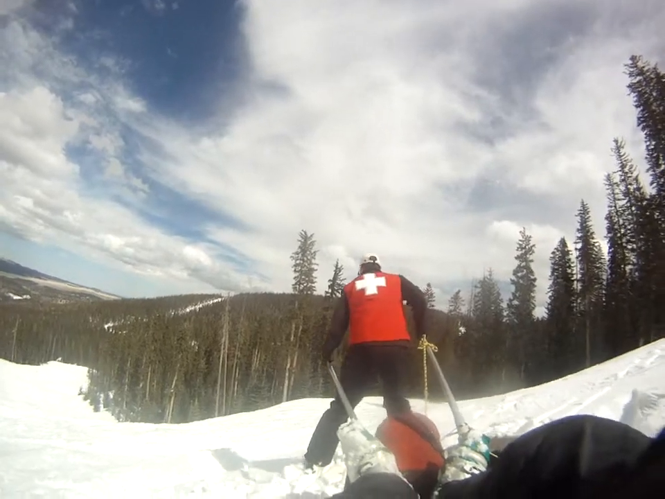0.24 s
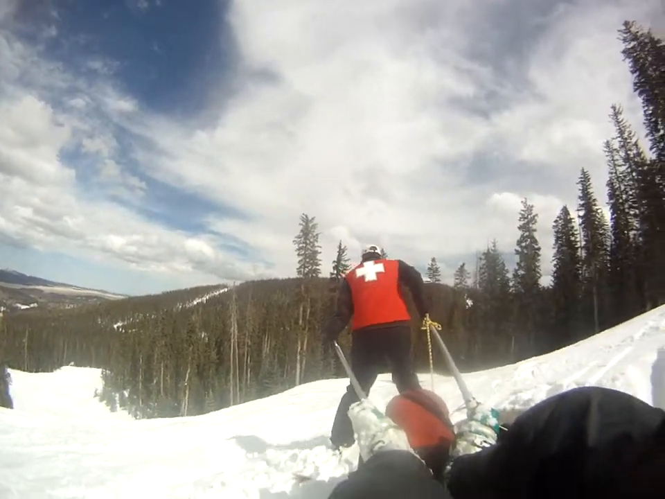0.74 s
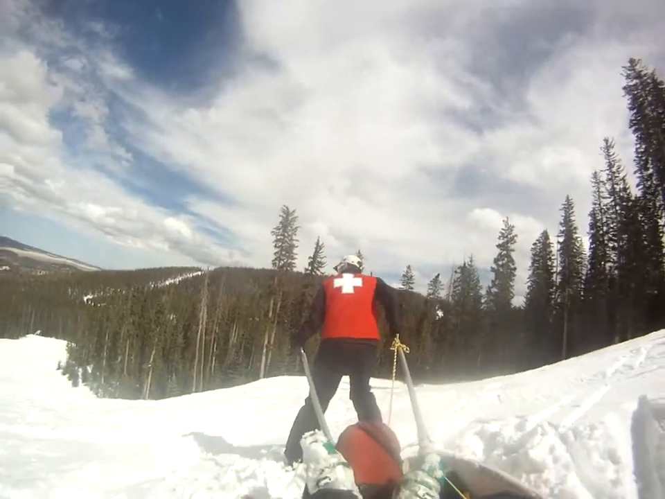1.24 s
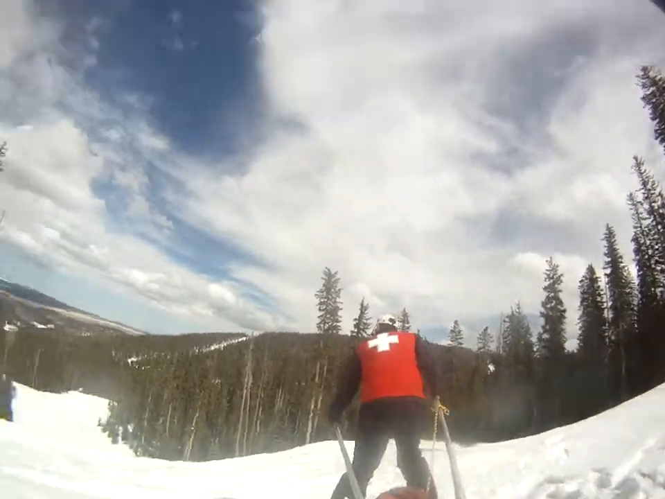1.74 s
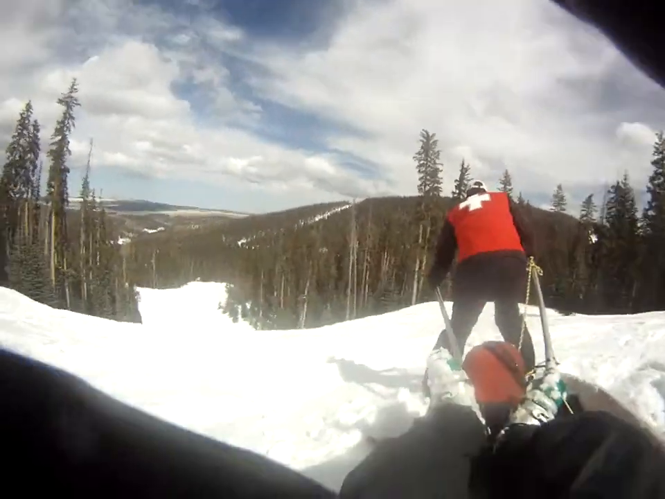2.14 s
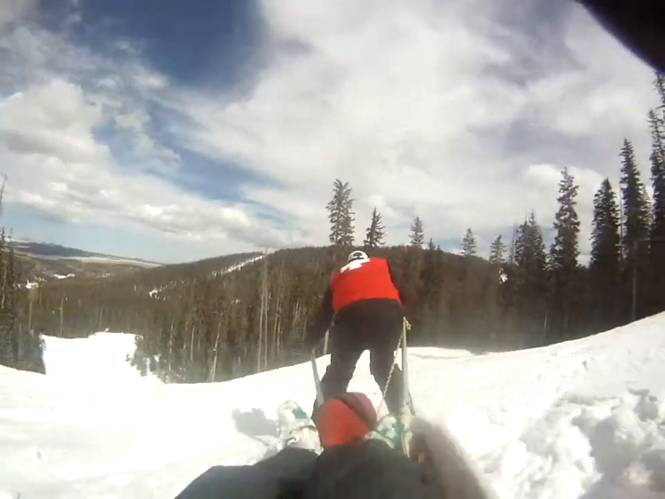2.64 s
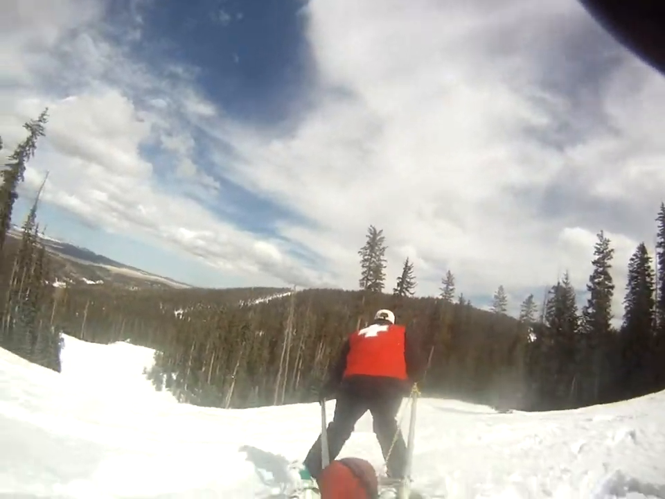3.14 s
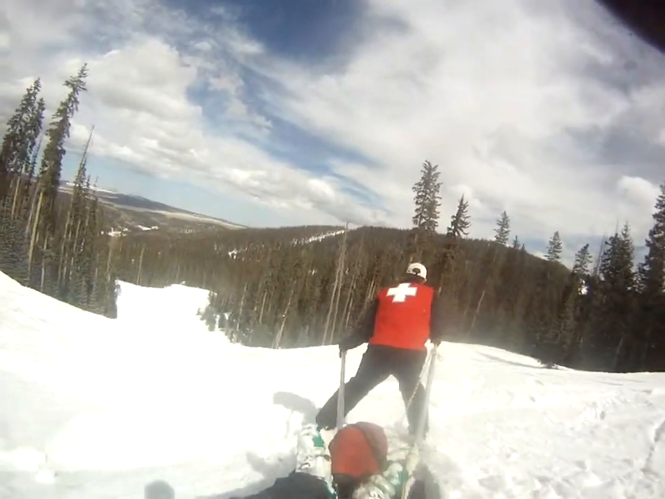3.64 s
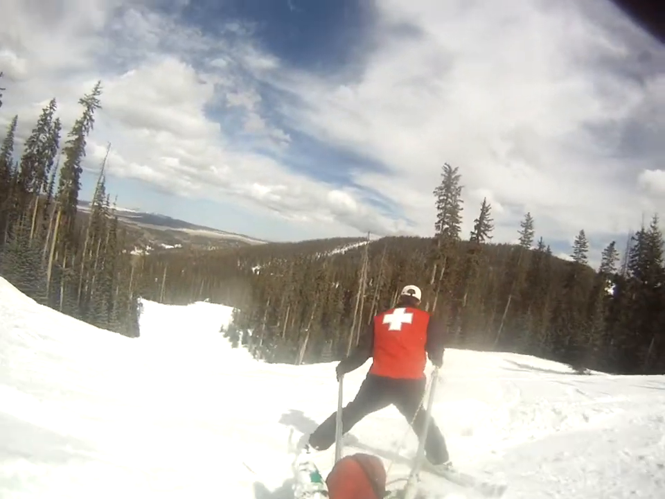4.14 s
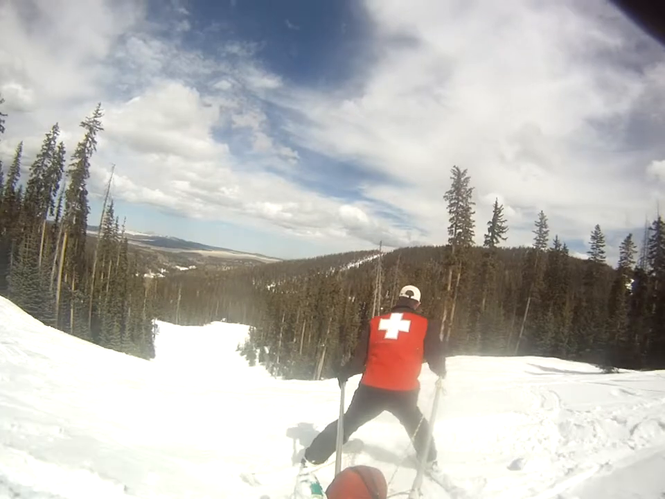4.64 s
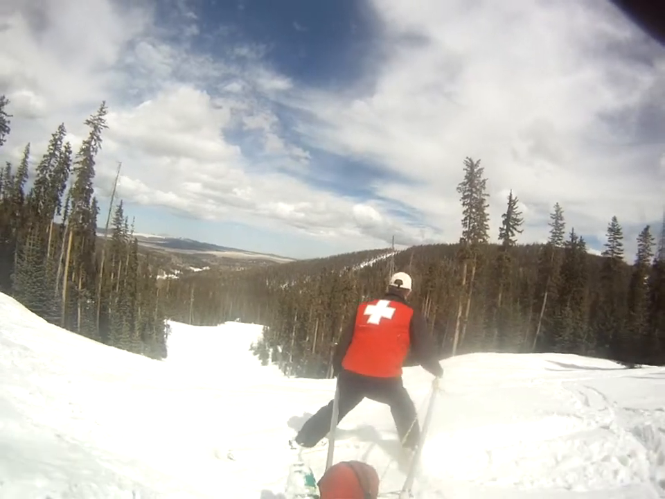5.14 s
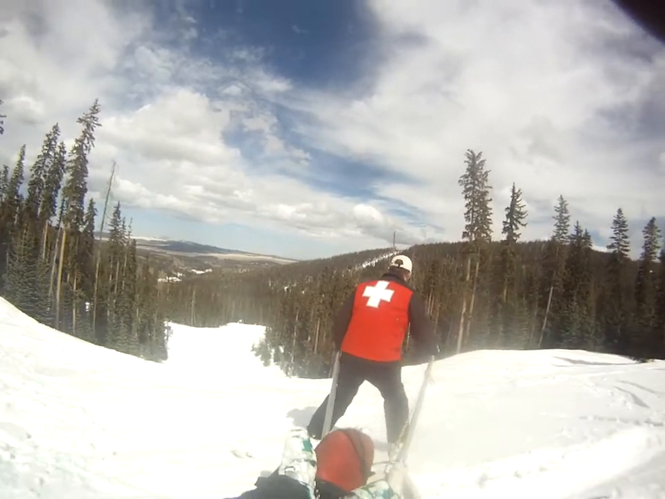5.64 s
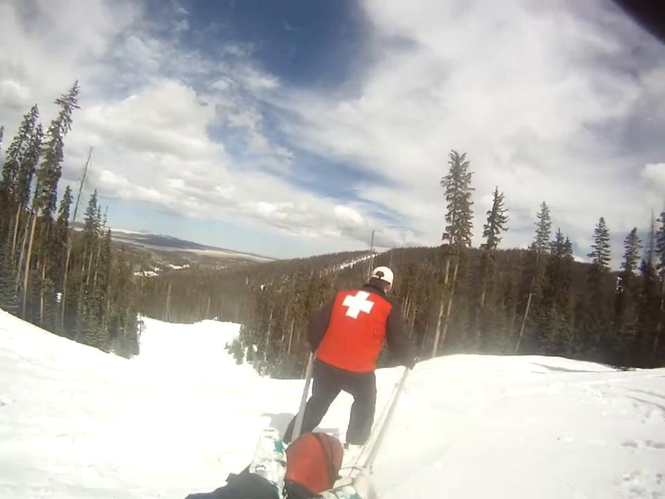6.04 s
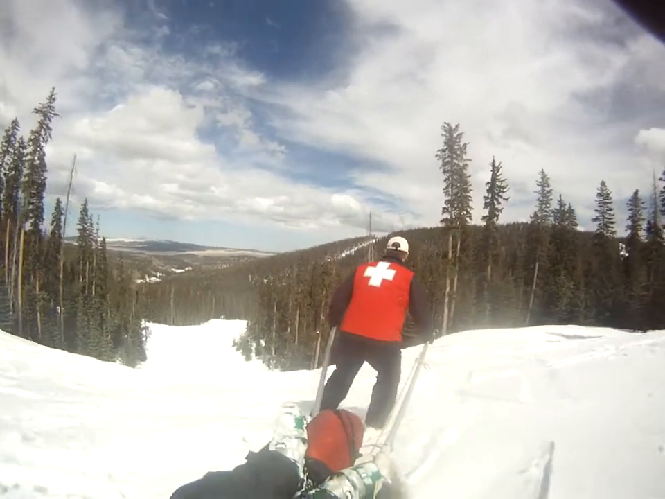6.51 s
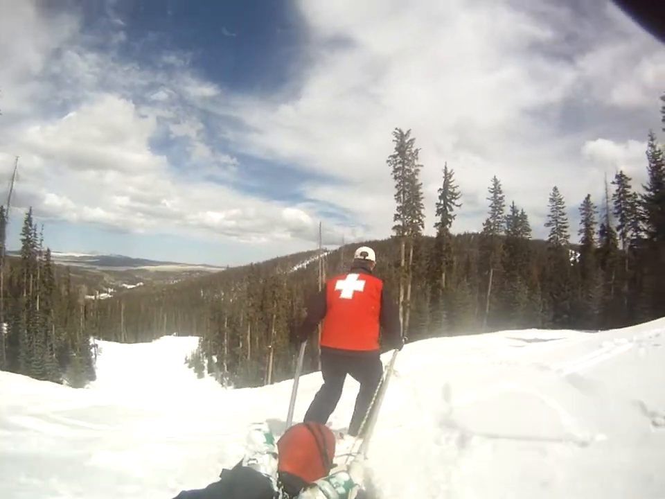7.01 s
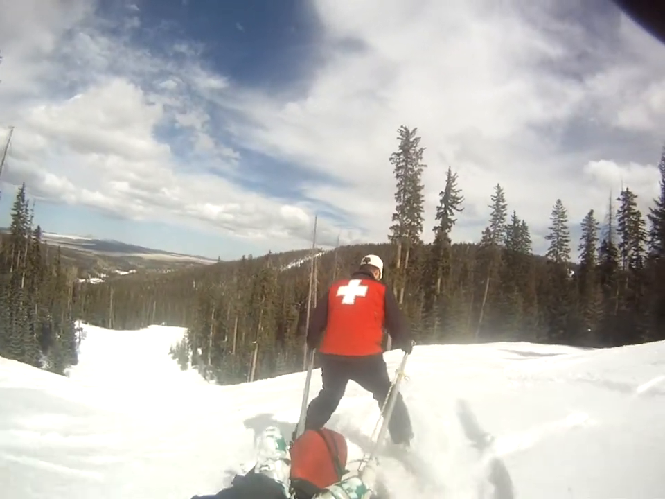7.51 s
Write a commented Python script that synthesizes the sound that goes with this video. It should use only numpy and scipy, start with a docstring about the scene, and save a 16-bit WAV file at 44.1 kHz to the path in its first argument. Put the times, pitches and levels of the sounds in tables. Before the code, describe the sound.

A sled slides down an open snowy slope with a grainy, gritty hiss over a faint low drone. Close handling noise comes first: fabric crackles, thuds rumble, and the plastic shell clatters harder and harder until about two seconds. It settles after a short creak. The hiss thickens, interrupted by a few dry, loud knocks and a late single one. The sound is close, boxy and coarse, with a gritty digital edge and no echo.

```python
"""A camera in a closed plastic housing rides a rescue sled down a snow slope, its glide hiss running throughout.
The first two and a half seconds are busy: cloth rubs as clumped clicks through the shell's resonances,
knocks ring the same modes, and jolts rumble and thump in low noise bands and decaying sines. A brief squeak
of even slips follows; later, over a stronger hiss, come sparse hard knocks, last just before the end.
The camera samples at 12 kHz and holds each sample, which mirrors the sound upward."""
import sys
import numpy as np
from scipy import signal
from scipy.io import wavfile

SR = 44100
rng = np.random.default_rng(int(sys.argv[2]) if len(sys.argv) > 2 else 0)


def waveform_to_disk(signal):
    """Save audio, clipped to [-1, 1], as 16-bit WAV at the path in sys.argv[1]."""
    frames = np.transpose(np.atleast_2d(signal))
    scaled = np.clip(frames, -1, 1) * 32767
    samples = np.round(scaled).astype(np.int16)
    wavfile.write(sys.argv[1], SR, samples)


N = 342657

# knocks on the shell, levels before the drive:
# start_s, level_db, low_modes_db, high_modes_db, crack_db (top modes), contact_ms (time scale of the push)
KNOCKS = [(0.186, -28.5, 2, 19, -10, 2.2), (0.546, -39, 15, -1, -1, 2.2), (1.006, -26, -16, 11.5, 16, 3),
          (1.343, -26, 6, -4, -11, 4.3), (1.604, -38, 11, -8, -1, 2.5), (1.639, -16.5, 11, 14, -10, 1.1),
          (1.657, -12.5, 6, -21, -1, 4), (1.802, -20, 8, -4, -13, 2.4), (1.85, -28, 14, 0, -10, 3.7),
          (2.014, -0.5, 7.5, -0.5, -5, 2.3), (2.047, -23, 10.5, 3, 4, 1.4), (2.076, -7, -6, -3, 13.5, 1.44),
          (2.147, -19, -1, -1, 2, 2.3), (2.219, -26, -3, 8, 12, 3.8), (2.252, -21, -9, 3.5, -1, 3.5),
          (2.35, -16.5, 14.5, 5.5, 7.5, 3.17), (2.981, -29, 6, 1, -14, 5.8),
          (3.189, -38, 17.5, 6, -11, 1.7), (3.669, -40, 13.5, 6, -4, 1.3), (5.167, -1.5, -2, -1, -8, 0.67),
          (5.17, -10, 6, -1, -19, 1.9), (5.186, -27, 10, 2, -14, 3), (5.196, -30, 9.5, 2, -12, 4.9),
          (5.218, -38, 18, -7, -4, 1.9), (5.437, -9, 8.5, 3, 2.5, 2.67), (5.469, -20.5, 5, -5, -19, 6.3),
          (5.539, -28, -12, -14, -7, 1.2), (5.572, -32, 3, -10, 0, 1.5), (5.779, -9, 4, -5, -11, 4.4),
          (5.785, 2, 0.5, -6.5, -21, 2.7), (5.796, -5.5, 7, -4, -10, 2.9),
          (5.826, -18.5, 18, 1.5, -13, 2.56), (7.63, -31.5, -21, -8, 0, 16), (7.654, 1, -1.5, 1, -21, 1.37),
          (7.66, -9.5, 6.5, -11, -12, 2.6)]
# strokes of cloth on the shell, levels before the drive:
# loudest_s, rise_s, fall_s, level_db, low_modes_db, high_modes_db
RUBS = [(0.036, 0.18, 0.064, -42, 0, 7), (0.118, 0.024, 0.025, -37.5, -6, -9),
        (0.2, 0.033, 0.068, -32.5, -1.5, 6.5), (0.338, 0.066, 0.049, -35, -1, -6),
        (0.44, 0.12, 0.2, -52.5, 1.5, -6), (0.547, 0.022, 0.19, -56, 3.5, -5),
        (1.013, 0.026, 0.069, -32.5, -1, 1), (1.12, 0.18, 0.1, -46.5, -1.5, -10.5),
        (1.192, 0.022, 0.076, -48, 14.5, -1), (1.311, 0.075, 0.016, -44.5, 11, -9),
        (1.346, 0.016, 0.076, -44.5, -1, -9), (1.61, 0.021, 0.042, -41, 7.5, -11),
        (1.569, 0.071, 0.028, -47, 4, -6.5), (1.653, 0.038, 0.023, -32.5, 4.5, -0.5),
        (1.698, 0.025, 0.083, -31, -1, -5), (1.79, 0.086, 0.059, -40, -0.5, -2.5),
        (1.868, 0.089, 0.081, -36, -1, -6), (1.962, 0.078, 0.07, -27, -2, -2.5),
        (2.03, 0.013, 0.022, -59, -5, -19), (2.095, 0.021, 0.055, -24, -4, -5.5),
        (2.224, 0.087, 0.082, -35, -3.5, -4), (2.685, 0.063, 0.071, -50.5, 7, -4),
        (2.96, 0.16, 0.069, -49, 3.5, -14), (3.06, 0.046, 0.3, -61.5, 7.5, -38),
        (5.5, 0.087, 0.23, -50.5, 0.5, 1), (5.93, .16, 0.12, -49, -5.5, -3)]
# how cloth damps and evens out the modes: width_factor (ratio), body_db, low_db, high_db, top_db
CLOTH = (1.204, 4.5, 7.16, 2.86, 3.2)
# jolts shaking the microphone, levels before the drive: time_s, rumble_db, brightness_db_per_octave
JOLTS = [(0.0, -20, -8), (0.02, -38.5, -10), (0.37, -46.5, 0), (0.49, -65, 2), (0.54, -46.5, -2.5),
         (0.95, -71, 3), (0.99, -47, -0.5), (1.31, -50, 0.5), (1.35, -34.5, -0.5), (1.4, -78.5, 6.5),
         (1.49, -65, 2), (1.59, -33, -4.5), (1.75, -41.5, 0.5), (2.02, -33, -0.5), (2.18, -51, 1),
         (2.25, -33.5, -0.5), (2.29, -50.5, -2), (2.58, -56.5, -4.5), (2.64, -44.5, -2.5),
         (2.68, -58.5, -0.5), (3.2, -52, -2.5), (3.3, -73, -12)]
# single pushes on the shell: start_s, level_db (before decay), pitch_hz
THUMPS = [(0.028, -20, 70.5), (0.084, -21.5, 52.4), (0.548, -37, 45), (0.819, -32.5, 60), (1.09, -34, 51.1),
          (1.344, -42, 51.1), (1.582, -17, 112), (1.637, -15.5, 53), (1.871, -23.5, 74.5), (1.981, -27, 40),
          (2.071, -34, 51.7), (2.615, -41, 70), (2.632, -33, 150), (3.148, -40, 51.4), (3.669, -34, 51.7),
          (5.784, -47, 363), (5.825, -33, 282), (7.66, -43, 294)]
# spectrum of the rumble, before brightness: pitch_hz, density_db (per Hz)
RUMBLE_COLOUR = [(12, 17), (20, 9), (151, -4), (281, -7.5), (315, -9), (419, -12), (491, -17), (900, -15.5),
                 (1170, -55), (1980, -120)]
# the glide over snow: time_s, hiss_db
GLIDE = [(0.0, -59.5), (0.87, -57), (1.4, -56), (2.4, -52), (3.12, -54), (4.36, -51), (4.99, -50.5),
         (5.31, -47.5), (5.6, -51), (5.99, -46.5), (6.32, -50.5), (7.2, -47.5), (7.51, -52), (7.77, -46)]
# resonances of the housing, before the touch colours them: pitch_hz, width_hz, level_db
HOUSING = [(300, 424, -22.5), (681, 625, -25), (933, 180, -18), (1244, 470, -7.5), (1756, 620, -12),
           (2087, 368, 2.5), (2763, 856, -11), (3418, 410, -3), (4560, 4000, -29), (5064, 1100, -13)]

# how strongly each contact drives its sound (dB)
KNOCK_DRIVE_DB, RUB_DRIVE_DB, JOLT_DRIVE_DB = 12, 15, 21.5
RISE_LEAD_S = .0008  # contact begins this long before the listed start
# each knock rattles twice more: softer, at uneven gaps around this mean
RATTLE_GAP_S, RATTLE_DB, RATTLE_LOSS_DB, RATTLE_MS = .013, -31, 4.5, 7.6
STROKE_FADE_DB, STROKE_CURVE = 19.5, 1.47  # loss after one rise or fall time; 1 = pointed, 2 = rounded
# squeak: slips per second at its start and end; level drives the slips
SQUEAK_S, SQUEAK_LENGTH_S, SQUEAK_HZ, SQUEAK_END_HZ, SQUEAK_DB = 2.845, .11, 243, 234, -18
TICKS_PER_S, TICK_DB = 20, 18.5  # icy lumps tick against the hull: mean rate, strength in the crush
DRONE_DB, DRONE_FOLLOWS = -55.5, 0.76  # drone at mean glide; share of the hiss's swing in dB
SAMPLING_HZ, CUTOFF_HZ = 12000, 15330


def knocks():
    """Each knock is a push of a few ms on every mode, in a phase of its own, with chatter on top."""
    force, favour = np.zeros((len(HOUSING), N)), np.zeros((3, N))
    chance = rng.uniform(-0.98, 1, (len(KNOCKS), 3, len(HOUSING), 603))
    age, hz = np.arange(600) / SR, np.array(HOUSING)[:, :1]
    for (s, level_db, *favour_db, contact_ms), draws in zip(KNOCKS, chance):
        for again, draw in enumerate(draws):
            gap_s = RATTLE_GAP_S * (1 + .3 * draw[0, 0])
            start = round((s - RISE_LEAD_S + again * gap_s) * SR)
            at = slice(start, start + 600)
            blow_db, length_ms = level_db, contact_ms
            if again:
                blow_db = level_db + RATTLE_DB - RATTLE_LOSS_DB * (again - 1) + 3 * draw[1, 0]
                length_ms = RATTLE_MS
            part = age * 1000 / max(length_ms, .2)
            # a rounded push, then a faint buzz as the parts settle
            contact = part ** 1.5 * np.exp(-2.6 * part ** 1.5)
            contact = contact + .015 * np.exp(-age / .005)
            detuned_hz = hz * (1 + 0.17 * draw[:, 1:2])
            tone = np.sin(2 * np.pi * detuned_hz * age + np.pi * draw[:, 2:3])
            chatter = 3.28 * draw[:, 3:]
            force[:, at] += from_db(blow_db + KNOCK_DRIVE_DB) * (tone + chatter) * contact
            favour[:, at] = np.c_[favour_db]
    low_db, high_db, crack_db = favour
    return housing(force, (low_db - 1.5, low_db, high_db, crack_db), wider=1.4)  # low blows also move the body


def rubs():
    """Threads catch and slip: dense uneven clicks in clumps, under each stroke."""
    press, low_db, high_db = strokes()
    wider, body_db, low_lift_db, high_lift_db, top_lift_db = CLOTH
    sizes = from_db(2.15 * np.minimum(rng.exponential(1, (2, N)), 5)) * rng.choice([-1, 1], (2, N))
    clicks = rng.random((2, N)) < 6000 / SR  # 6000 a second on average
    clumps = from_db(0.65 * drift(63) + 2.0 * drift(24))
    slips = rms_one(sizes * clicks * clumps)
    favour_db = low_db + body_db, low_db + low_lift_db, high_db + high_lift_db, high_db + top_lift_db
    return housing(press * from_db(RUB_DRIVE_DB) * slips, favour_db, wider, patchy_db=1.5)


def strokes():
    """Each stroke swells and fades; where strokes overlap their colours blend by strength."""
    t, (gain, low, high) = np.arange(N) / SR, np.full((3, N), 1e-9)
    for s, rise, fall, level_db, low_db, high_db in RUBS:
        away = np.where(t < s, (s - t) / max(rise, .004), (t - s) / max(fall, .004))
        press = from_db(level_db - STROKE_FADE_DB * np.minimum(away, 8) ** STROKE_CURVE)
        gain, low, high = gain + press, low + press * low_db, high + press * high_db
    return gain, low / gain, high / gain


def squeak():
    """Cloth sticks and slips evenly, slowing a little, and rings the low modes of the shell."""
    part = np.clip((np.arange(N) / SR - SQUEAK_S) / SQUEAK_LENGTH_S, 0, 1)
    turns = np.cumsum(SQUEAK_HZ + (SQUEAK_END_HZ - SQUEAK_HZ) * part ** 2) / SR
    slips = np.diff(np.floor(turns), prepend=0)  # one click per whole turn
    slips = slips * np.sin(np.pi * part) ** .5
    return housing(from_db(SQUEAK_DB) * slips[None, :], (30, 17, -8, -12))


def jolts():
    """Bumps shake the microphone: lumpy rumble, and single pushes that swing once or twice."""
    level_db, bright = in_time(JOLTS, -107)
    out = from_db(level_db + JOLT_DRIVE_DB) * rumble(bright, lumpy_db=5.0, swell_db=2.04)
    age = np.arange(2000) / SR
    for s, push_db, hz in THUMPS:
        at = round(s * SR)
        out[at:at + 2000] -= from_db(push_db) * np.sin(2 * np.pi * hz * age) * np.exp(-1.8 * hz * age)
    return out


def glide():
    """Snow crystals crushed under the hull: dense, slightly grainy hiss over a low drone."""
    hiss_db, = in_time(GLIDE, -50)
    drone_db = DRONE_DB + DRONE_FOLLOWS * (hiss_db - hiss_db.mean())
    crush = rng.standard_normal((2, N)) * from_db(1.0 * drift(23) + 0.077 * drift(2.9))
    ticks = rng.laplace(size=N) * (rng.random(N) < TICKS_PER_S / SR)
    crush = crush + from_db(TICK_DB) * ticks
    hiss = from_db(hiss_db) * rms_one(housing(crush, patchy_db=-1.17))
    drone = from_db(drone_db) * rms_one(rumble(0, lumpy_db=1.0, swell_db=2.86))
    return hiss + drone


def rumble(bright, lumpy_db, swell_db):
    """Low noise in half-octave bands, in quick lumps and slow swells; bright tilts it about 60 Hz."""
    hz, colour_db = np.transpose(RUMBLE_COLOUR)
    edges, white = 16 * 2 ** np.arange(0, 6.1, .5), rng.standard_normal((2, N))
    out, together_db = 0, lumpy_db * drift(24.7) + swell_db * drift(1.65)
    for k, (low, high) in enumerate(zip(edges, edges[1:])):
        mid = np.sqrt(low * high)
        band = signal.sosfilt(signal.butter(2, [low, high], "band", fs=SR, output="sos"), white[k % 2])
        band_db = np.interp(np.log(mid), np.log(hz), colour_db) + bright * np.log2(mid / 60)
        out = out + band * from_db(band_db + together_db + 2.85 * drift(15.8))
    return out


def housing(force, favour_db=(0, 0, 0, 0), wider=1, patchy_db=0):
    """The shell rings in its modes; where and how it is touched favours body, low, high or top modes."""
    out = np.zeros(N)
    body_db, low_db, high_db, top_db = favour_db
    for k, (hz, width, level_db) in enumerate(HOUSING):
        r = np.exp(-np.pi * width * wider / SR)
        group = np.searchsorted([850, 1800, 2500, 4000], hz)  # borders between mode groups, Hz
        group_db = [body_db, low_db, 0, high_db, top_db][group]
        push = force[k % len(force)] * from_db(level_db + group_db + patchy_db * drift(5.0))
        mode = [(1 - r * r) / 2, 0, (r * r - 1) / 2, 1, -2 * r * np.cos(2 * np.pi * hz / SR), r * r]
        out += signal.sosfilt([mode, mode], push + 1e-18)  # twice through: steep flanks
    return out


def from_db(db):
    """Decibels to gain."""
    return 10 ** (np.asarray(db) / 20)


def rms_one(x):
    """Scaled to rms 1."""
    return x / np.sqrt(np.mean(x ** 2) + 1e-20)


def in_time(rows, rest):
    """Columns of a curve, sample by sample; the first column rests after its end."""
    t = np.arange(N) / SR
    s, *columns = np.transpose(rows)
    out = [np.interp(t, s, c) for c in columns]
    out[0] = np.where(t <= s[-1], out[0], rest)
    return out


def drift(rate):
    """Slow chance of spread 1: noise twice through a one-pole low-pass at rate Hz."""
    r = np.exp(-20 * np.pi * rate / SR)  # made at a tenth of SR
    noise = rng.standard_normal(N // 10 + 8002)
    slow = signal.lfilter([1], [1, -2 * r, r * r], noise)[8000:]  # run-in dropped
    return np.interp(np.arange(N) / 10, np.arange(len(slow)), rms_one(slow))


def scene():
    """All that reaches the microphone inside the housing."""
    return (glide() + jolts() + rubs() + knocks() + squeak())[None, :]


def record(dry):
    """Peaks rounded, band-limited, sampled at 12 kHz, each sample held four ticks of 48 kHz; then the top is cut."""
    no_subsonic = signal.sosfilt(signal.butter(2, 22, "high", fs=SR, output="sos"), dry)
    rounded = 0.86 * np.tanh(no_subsonic / 0.99)
    smooth = signal.sosfilt(signal.butter(8, 5350, fs=SR, output="sos"), rounded)
    sampled = signal.resample_poly(smooth, SAMPLING_HZ // 300, SR // 300, axis=1)
    held = np.repeat(sampled, 4, axis=1)
    held = signal.resample_poly(held, 147, 160, axis=1)[:, :N]  # 48 kHz back to SR
    held = np.pad(held, ((0, 0), (0, N - held.shape[1])))
    return signal.sosfilt(signal.ellip(12, .3, 60, CUTOFF_HZ, fs=SR, output="sos"), held)


dry = scene()
out = record(dry)
waveform_to_disk(out)
```